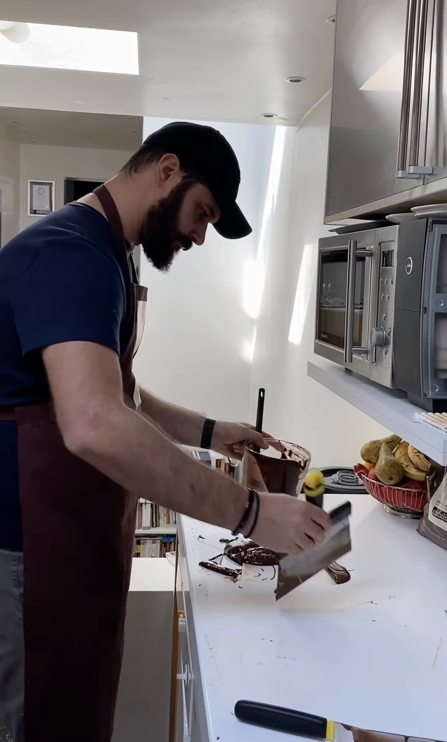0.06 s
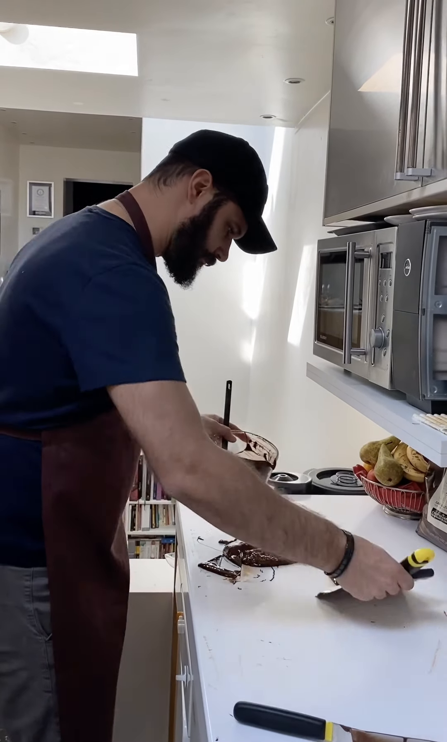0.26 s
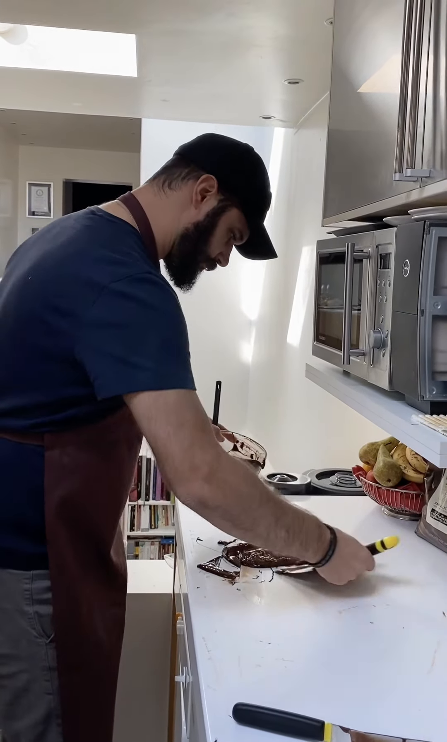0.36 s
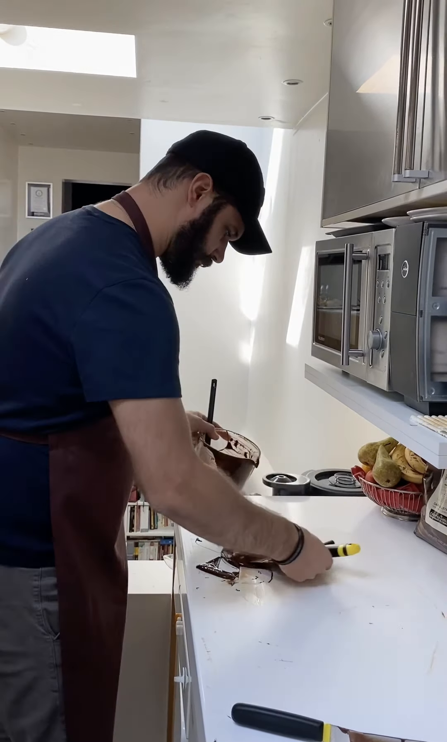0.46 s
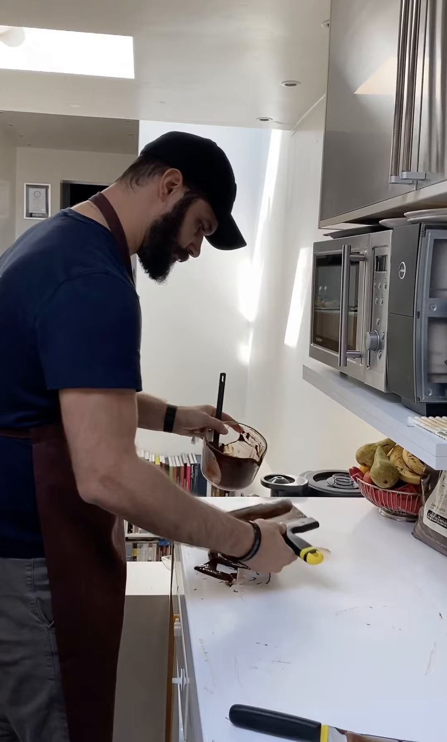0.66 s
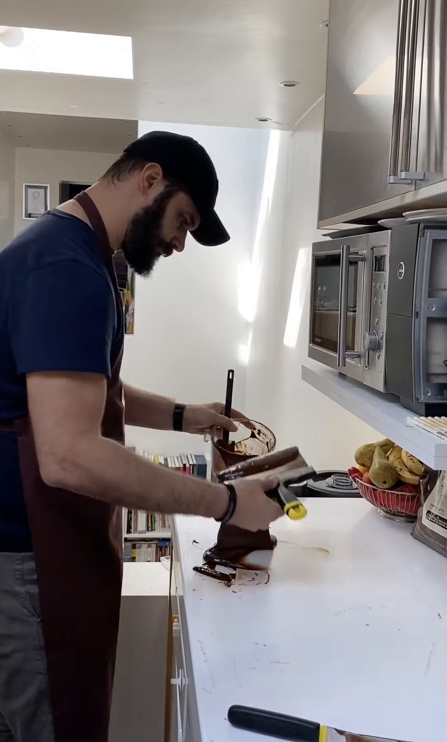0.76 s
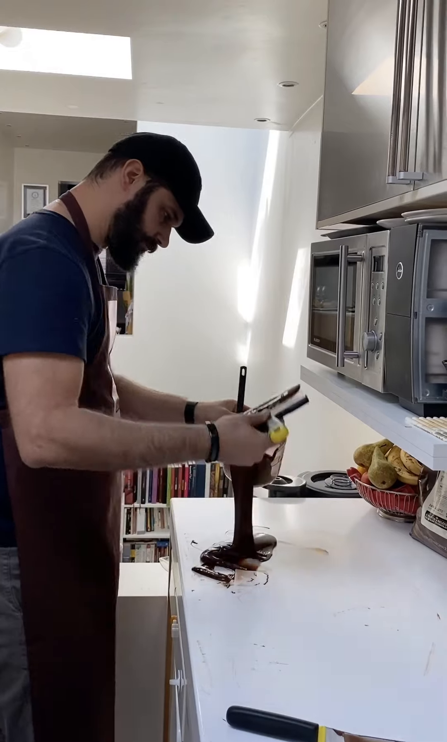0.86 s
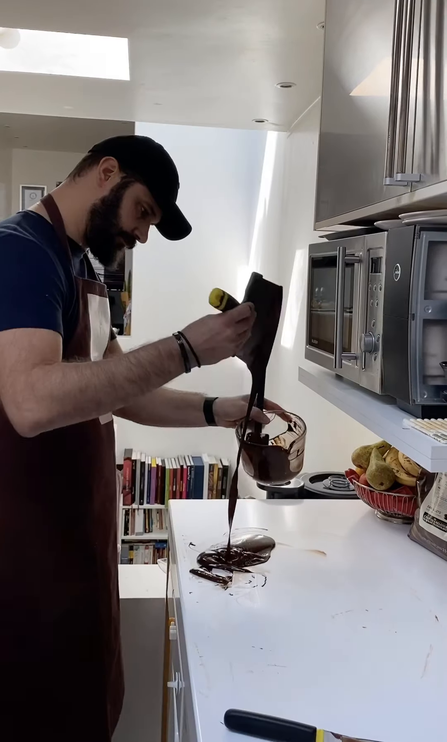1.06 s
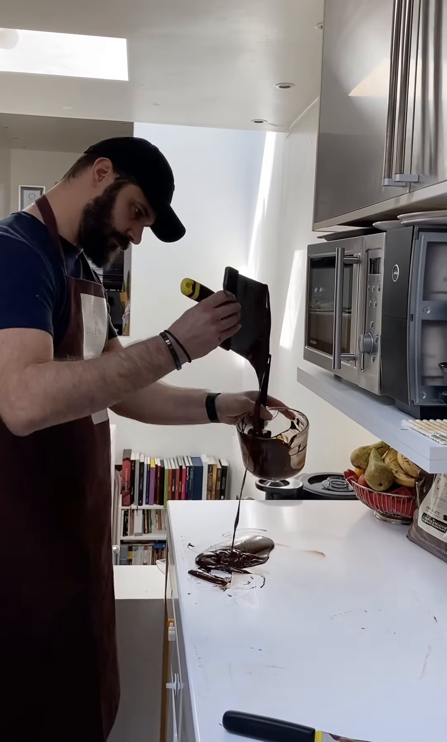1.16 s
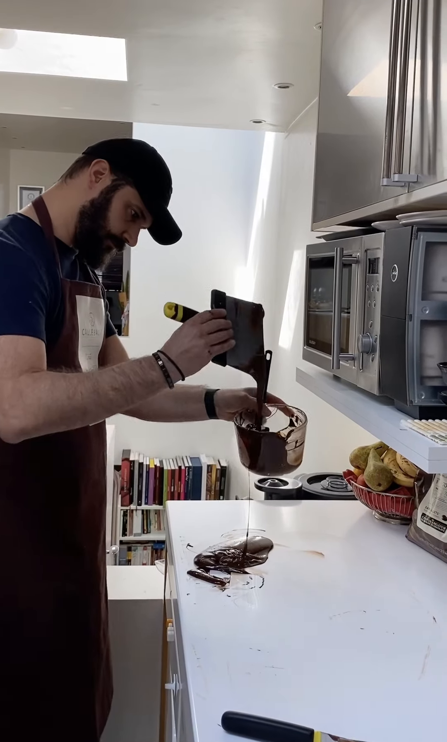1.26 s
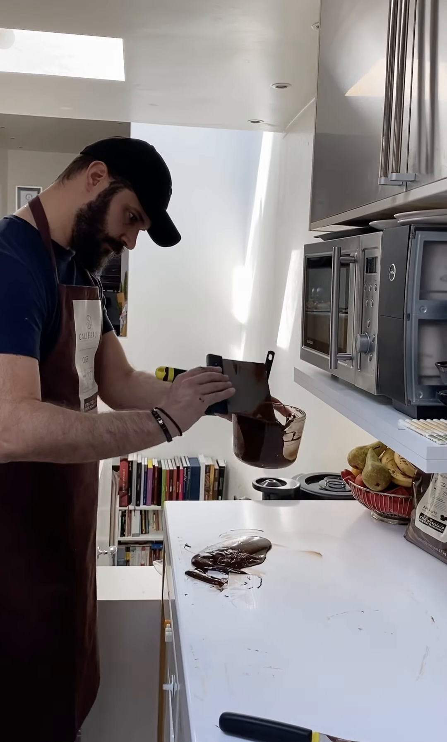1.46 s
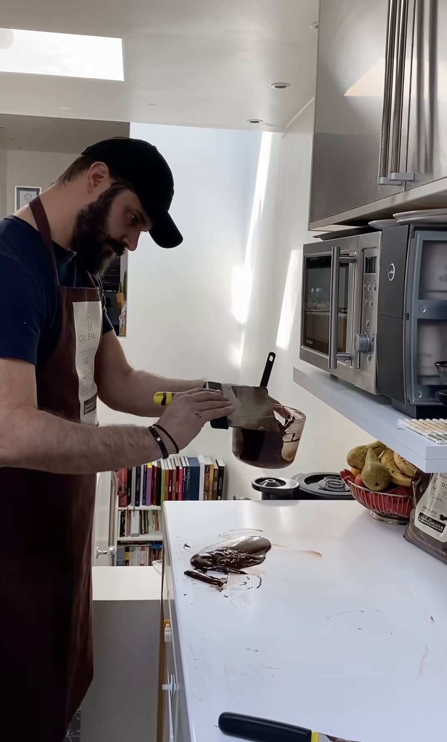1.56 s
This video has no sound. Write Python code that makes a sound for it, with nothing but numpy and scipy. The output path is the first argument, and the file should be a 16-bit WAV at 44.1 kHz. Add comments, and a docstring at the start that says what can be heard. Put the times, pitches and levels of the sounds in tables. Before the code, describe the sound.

A steel scraper clacks sharply onto a stone counter and slides through melted chocolate with a short gritty hiss. Later it faintly taps and rasps a bowl's rim, heard close up in a slightly echoing kitchen.

```python
"""Low rumble in a hard kitchen, and at once a steel scraper touches, then clacks down on the stone counter.
The blade rings, the stone thumps, and grit hisses under the edge as it slides through melted chocolate.
A faint rustle of arms swells; then the blade rasps on a bowl's rim and taps it, making the bowl ring.
A phone's small stereo microphone pair hears the blade close, with echoes off the far wall and cupboards."""
import sys
import numpy as np
from scipy import signal
from scipy.fft import rfft, irfft
from scipy.io import wavfile

SR = 44100
rng = np.random.default_rng(int(sys.argv[2]) if len(sys.argv) > 2 else 0)


def file_out(sig):
    """Save sig as 16-bit WAV at sys.argv[1]."""
    # one column per channel
    cols = np.atleast_2d(sig).T
    # limit, then scale
    lim = np.clip(cols, -1, 1)
    pcm = np.round(lim * 32767).astype(np.int16)
    wavfile.write(sys.argv[1], SR, pcm)


N = 70560

# modes of the bowl: (frequency [Hz], level [dB], t60 [s])
BOWL_MODES = [(370, -5, .08), (686, -2, .05), (1450, -14, .012), (2130, 0, .022), (3200, -16, .015),
              (3970, -9, .035), (5500, -17, .012)]
RING_RISE_S = 0.0011
GRAINS_PER_S, GRAIN_SPREAD_DB = 16000, -1.5  # grit under the edge


def amp(db):
    return 10 ** (np.asarray(db) / 20)


def unit_rms(x):
    return x / np.sqrt(np.mean(x ** 2) + 1e-20)


def at_hz(points, hz):
    """Reads a curve along a logarithmic frequency axis."""
    f, value = np.transpose(points)
    return np.interp(np.log(hz + 1), np.log(f + 1), value)


def envelope(rows, column=1):
    """Turns a dB column of a curve in time into a gain for each sample."""
    rows = np.array(rows)
    return amp(np.interp(np.arange(N) / SR, rows[:, 0], rows[:, column]))


def add(mix, start_s, sound):
    part = mix[..., round(start_s * SR):][..., :sound.shape[-1]]
    part += sound[..., :part.shape[-1]]


def shaped(x, gain):
    """Filters x by a gain given as a function of frequency."""
    return irfft(rfft(x) * gain(np.fft.rfftfreq(x.shape[-1], 1 / SR)), x.shape[-1])


def coloured(noise, spectrum, resonances=()):
    """Noise at unit RMS, shaped by a dB spectrum and peaks (centre [Hz], width [Hz], gain [dB])."""
    def gain(hz):
        peaks = sum(amp(db) / (1 + (2 * (hz - f) / width) ** 2) for f, width, db in resonances)
        return amp(at_hz(spectrum, hz)) * (1 + peaks)
    return unit_rms(shaped(noise, gain))


def ring(modes, t):
    """Struck modes: a sum of dying sines."""
    return sum(amp(db - 60 * t / t60) * np.sin(2 * np.pi * hz * t) for hz, db, t60 in modes)


def grit(per_s, spread_db):
    """Dense random clicks of uneven size."""
    size = amp(spread_db * np.minimum(rng.exponential(1, N), 5))
    return unit_rms(size * rng.standard_normal(N) * (rng.random(N) < per_s / SR))


def room_tone():
    """Rumble and hush of the kitchen all around the microphones; the deepest part throbs."""
    # steady background: (frequency [Hz], level [dB])
    spectrum = [(20, -42), (40, -8), (55, -5), (88, 3), (110, -14), (130, -17), (300, -15.5), (500, -28),
                (950, -28.5), (1500, -39), (2100, -33), (4500, -51), (10000, -66.5), (16000, -76.5)]
    throb_db, throb_per_s, throb_peak_s, throb_top_hz = 4, 8.2, 1, 114
    hush = coloured(rng.standard_normal((2, N)), spectrum)
    deep = shaped(hush, lambda hz: 1 / (1 + (hz / throb_top_hz) ** 8))
    throb = np.cos(2 * np.pi * throb_per_s * (np.arange(N) / SR - throb_peak_s))
    return amp(-56.5) * (hush - deep + amp(throb_db * throb) * deep)


def crack(t, t60=0.021):
    """The short burst of noise as steel strikes something hard."""
    # contact noise: (frequency [Hz], level [dB])
    spectrum = [(200, -44), (500, -7.5), (900, -10.5), (1900, -1.5), (2400, -13), (3700, -6.5),
                (6000, -9.5), (9000, -14.5), (12000, -24), (16000, -29.5)]
    return amp(-60 * t / t60) * coloured(rng.standard_normal(len(t)), spectrum)


def counter_clacks():
    """Steel meets stone: a crack, the ringing blade and the slower thump of the counter."""
    # contacts: (time [s], level [dB], brightness [dB], thump [dB])
    contacts = [(0.0648, -30.5, -4.5, 11), (0.0733, -38, -7, 25.5), (0.0785, -46.5, -11.5, 15.5),
                (0.129, -5.5, -4.5, -0.5)]
    # modes of the blade: (frequency [Hz], level [dB], t60 [s])
    blade_modes = [(555, -26, 0.075), (750, -9.5, 0.022), (835, 2.5, 0.027), (912, -10.5, 0.078),
                   (1053.5, -6, .05), (1091, -19, 0.11), (1193, -16, 0.3), (1264.6, -13.5, 0.1),
                   (1377, -14, .07), (1750, -17, 0.054), (1830, -16, 0.077), (1912.6, -8.5, 0.049),
                   (2048, -21, 0.12), (2945, -17.5, 0.04), (3610, -20, 0.01), (5888, -11, 0.016),
                   (7538, -5.5, 0.0068), (9330, -13, 0.0053)]
    # modes of the counter: (frequency [Hz], level [dB], t60 [s])
    counter_modes = [(58.7, -30.5, .25), (102.6, -31, .2), (178.5, -22.5, 0.2), (260.5, -26.5, .1),
                     (396, -25.5, .1), (585, -32.5, 0.087)]
    bright_hz, thump_rise_s = 2500, 0.0035
    low_cut = signal.butter(2, 520, "high", fs=SR, output="sos")  # the blade's hit is cut below about 500 Hz
    out, t = np.zeros(N), np.arange(SR // 2) / SR
    for start_s, db, bright_db, thump_db in contacts:
        modes = [(hz, d + bright_db * hz / (hz + bright_hz), t60) for hz, d, t60 in blade_modes]
        blade = amp(bright_db - 2.5) * crack(t) + ring(modes, t)
        blade = signal.sosfilt(low_cut, blade * np.minimum(t / RING_RISE_S, 1))
        thump = amp(thump_db) * ring(counter_modes, t) * (1 - np.exp(-t / thump_rise_s))
        add(out, start_s, amp(db) * (blade + thump))
    return out


def blade_slide():
    """Grit under the edge hisses through the resonances of the blade as it crosses the counter."""
    # the stroke: (time [s], level [dB], low body [dB], high bite [dB])
    stroke = [(.085, -90, 21, 10), (.112, -63.5, 23, 10), (.14, -37, 8, -8), (.22, -51.5, 11.5, -9),
              (.258, -41.5, 3, 0), (.274, -41.5, 0.5, 6.5), (.33, -39.5, -1, -0.5), (.4, -45.5, -5, -1.5),
              (.45, -53.5, 1, -4.5), (.52, -71, 15, 1), (.6, -77, 13, 4), (.75, -101, 6, 4),
              (.9, -130, -2, 0)]
    # hiss of the grit: (frequency [Hz], level [dB])
    spectrum = [(200, -30), (400, -14), (1050, -2.5), (1600, -10.5), (2840, -6.5), (4700, -10),
                (5800, -3.5), (8000, -7), (11000, -8.5), (13000, -24), (16000, -18)]
    # resonances of the sliding blade: (frequency [Hz], width [Hz], relative gain [dB])
    edge_modes = [(1051, 310, -14), (1230, 100, 8.5), (2800, 73, 3), (3740, 200, 9), (4090, 300, 6),
                  (4440, 130, -0.5), (5417, 290, -5.5), (5657, 70, -19.5), (6800, 48, -6.5),
                  (9220, 110, -12)]
    body_top_hz, bite_hz, bite_width_hz = 2020, 5805, 1200
    resonances = [(hz, width, db - 6.5) for hz, width, db in edge_modes]
    hiss = coloured(grit(GRAINS_PER_S, GRAIN_SPREAD_DB), spectrum, resonances)
    body = shaped(hiss, lambda hz: 1 / (1 + (hz / body_top_hz) ** 4))
    bite = shaped(hiss, lambda hz: np.exp(-((hz - bite_hz) / bite_width_hz) ** 2))
    rest = hiss - body - bite
    return envelope(stroke) * (rest + envelope(stroke, 2) * body + envelope(stroke, 3) * bite)


def arm_rustle():
    """A faint broad rustle that comes and goes as the arms move."""
    # movement: (time [s], level [dB])
    movement = [(0, -77), (.05, -73.5), (.6, -75.5), (.78, -74), (.87, -75), (.97, -69.5), (1.06, -66.5),
                (1.11, -71), (1.17, -81.5), (1.4, -95)]
    # colour of the rustle: (frequency [Hz], level [dB])
    spectrum = [(400, -28.5), (900, -5), (2300, -6.5), (4500, -11.5), (7000, -15), (11000, -22.5),
                (16000, -23)]
    grains = np.array([grit(per_s=14000, spread_db=2.5) for channel in range(2)])
    return envelope(movement) * coloured(grains, spectrum)


def rim_scrape():
    """The edge rasps along the rim and makes the bowl ring."""
    # the drag: (time [s], level [dB])
    stroke = [(1.412, -120), (1.42, -74.5), (1.433, -77), (1.445, -71), (1.5, -70.5), (1.522, -67.5),
              (1.54, -67), (1.585, -61.5), (1.6, -64)]
    # colour of the rasp: (frequency [Hz], level [dB])
    spectrum = [(300, -22.5), (700, -2), (1200, -6), (2300, -2.5), (3200, -3.5), (4100, -4.5), (5600, -6.5),
                (8000, -9), (11000, -21.5), (16000, -32)]
    width_hz, ring_db = 160, 3.5
    resonances = [(hz, width_hz, ring_db) for hz, _, _ in BOWL_MODES]
    return envelope(stroke) * coloured(grit(GRAINS_PER_S, GRAIN_SPREAD_DB), spectrum, resonances)


def bowl_taps():
    """The blade touches the bowl lightly: each tap is a click and a short ring."""
    # touches: (time [s], level [dB], tilt [dB per octave])
    touches = [(1.4183, -61, 0), (1.4388, -60.5, 2), (1.4438, -55.5, -3.5), (1.4464, -55, -4.5)]
    pivot_hz = 1500
    out, t = np.zeros(N), np.arange(SR // 2) / SR
    for start_s, db, tilt in touches:
        modes = [(hz, d - abs(tilt) + tilt * np.log2(hz / pivot_hz), t60) for hz, d, t60 in BOWL_MODES]
        tap = ring(modes, t) + amp(-4) * crack(t)
        add(out, start_s, amp(db) * tap * np.minimum(t / RING_RISE_S, 1))
    return out


def kitchen_echoes(x):
    """Reflections die at each band's own speed, with a slap from the far wall and cupboards."""
    # decay of the room: (frequency [Hz], t60 [s])
    decay = [(100, .45), (500, 0.47), (1000, 0.22), (2500, 0.53), (6000, 0.42), (12000, 0.1)]
    build_up_s, slap_s, slap_spread_s, slap_db = 0.0036, 0.025, 0.0064, 4
    echoes = np.zeros((2, SR))
    arrivals = np.arange(0, SR - 20, 20) + rng.integers(0, 20, (2, (SR - 1) // 20))
    np.put_along_axis(echoes, arrivals, rng.choice([-1., 1.], arrivals.shape), 1)
    hz, t, bands = signal.stft(echoes, SR, nperseg=256)
    tail = signal.istft(bands * amp(-60 * t / at_hz(decay, hz)[:, None]), SR, nperseg=256)[1]
    t = np.arange(tail.shape[1]) / SR
    slap = amp(slap_db * np.exp(-((t - slap_s) / slap_spread_s) ** 2))
    tail *= np.minimum(t / build_up_s, 1) ** 2 * slap
    return signal.fftconvolve(x[None], tail / np.linalg.norm(tail[0]), axes=1)[:, :N]


def scene():
    """The close blade sounds and their echoes, over rustle and room tone."""
    close = counter_clacks() + bowl_taps() + blade_slide() + rim_scrape()
    return close + amp(-5) * kitchen_echoes(close) + arm_rustle() + room_tone()


def record(dry):
    """A phone's small stereo microphone pair: uneven colour and width, soft overload, a band limit."""
    # colour of what left and right share: (frequency [Hz], gain [dB])
    common_tone = [(20, -21), (32, -10.5), (50, -0.5), (11000, 1.5), (11800, 0), (12600, -11.5),
                   (13500, -30), (16000, -28.5)]
    # colour of what sets them apart: (frequency [Hz], gain [dB])
    spread_tone = [(40, -28.5), (125, -26), (300, -8.5), (700, -2.5), (1400, -5.5), (2800, 1), (5000, 4),
                   (6200, -5.5), (9000, 3), (12000, 11), (16000, 10)]
    # spread against the common part: (frequency [Hz], phase [rad])
    spread_phase = [(100, 1.6), (700, 0.59), (1400, 1.1), (2800, 2.3), (5500, 1.3), (10000, 3.9)]
    ceiling, top_hz = 0.95, 15900
    hz = np.fft.rfftfreq(N, 1 / SR)
    common, spread = rfft(dry)
    common = common * amp(at_hz(common_tone, hz))
    spread = spread * amp(at_hz(spread_tone, hz)) * np.exp(1j * at_hz(spread_phase, hz))
    pair = irfft(np.array([common + spread, common - spread]), N)
    pair = ceiling * np.tanh(pair / ceiling)
    band_limit = signal.firwin(511, top_hz, window=("kaiser", 9), fs=SR)
    return signal.oaconvolve(pair, band_limit[None], "same")


dry = scene()
out = record(dry)
file_out(out)
```